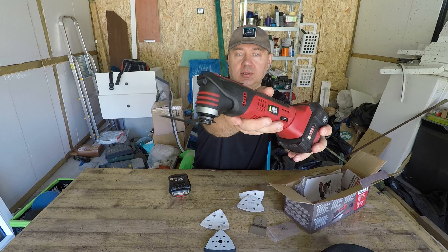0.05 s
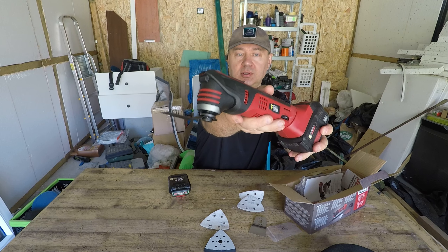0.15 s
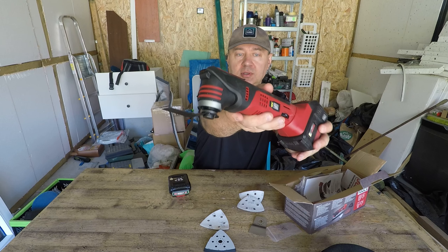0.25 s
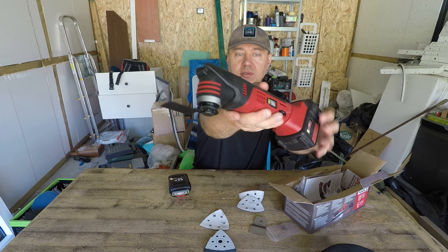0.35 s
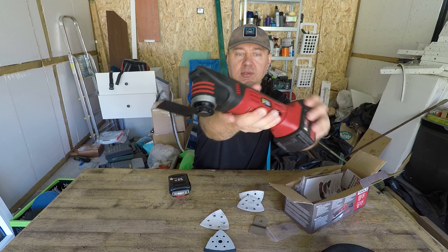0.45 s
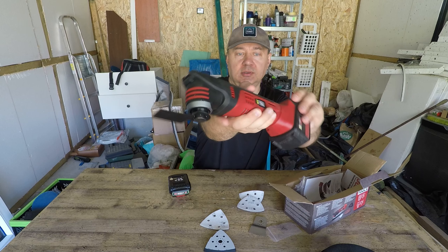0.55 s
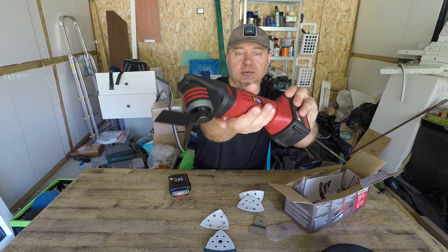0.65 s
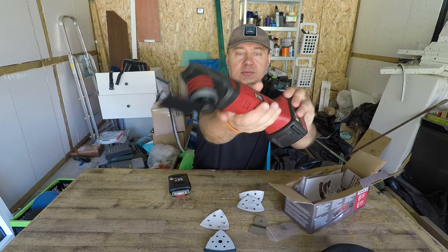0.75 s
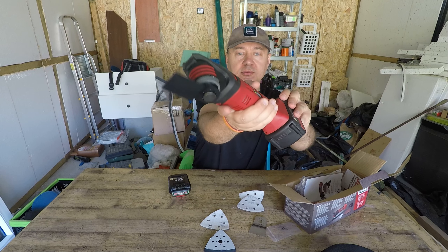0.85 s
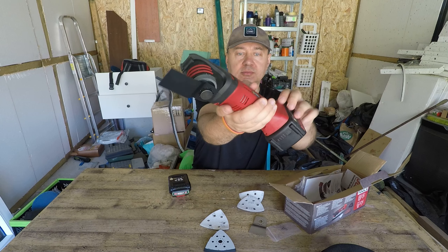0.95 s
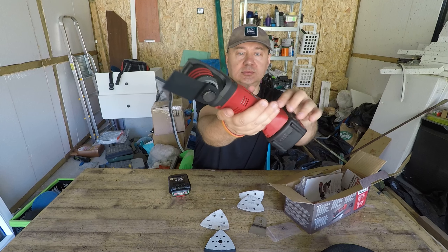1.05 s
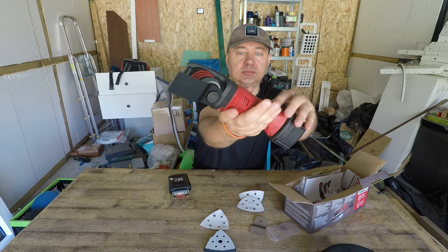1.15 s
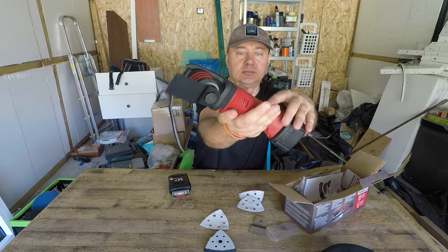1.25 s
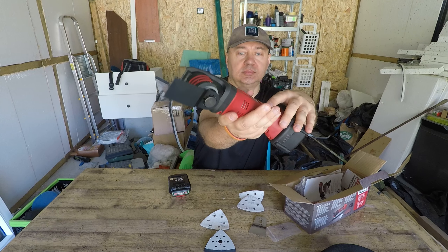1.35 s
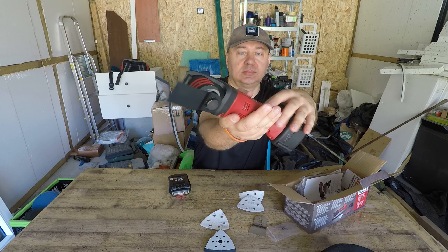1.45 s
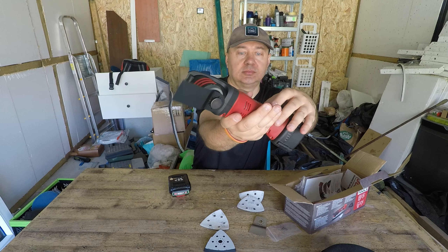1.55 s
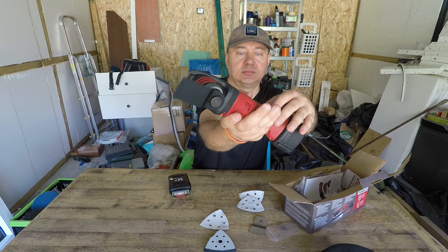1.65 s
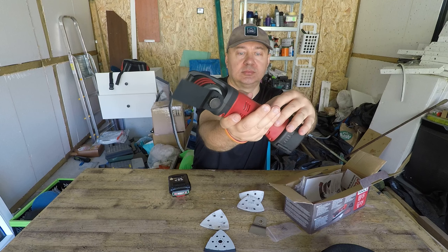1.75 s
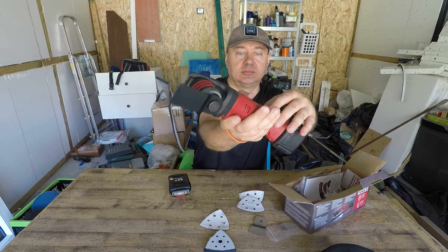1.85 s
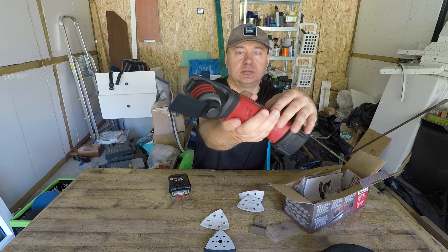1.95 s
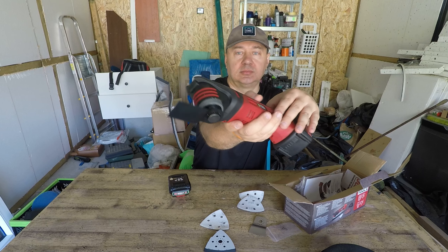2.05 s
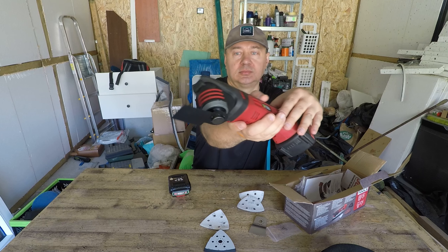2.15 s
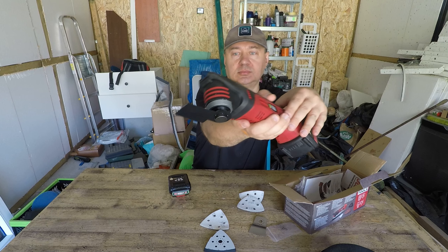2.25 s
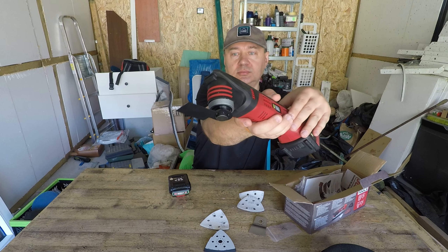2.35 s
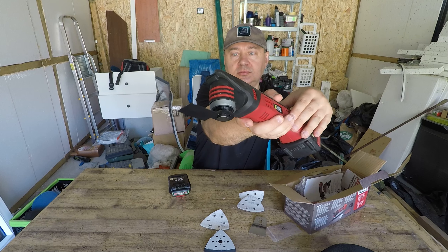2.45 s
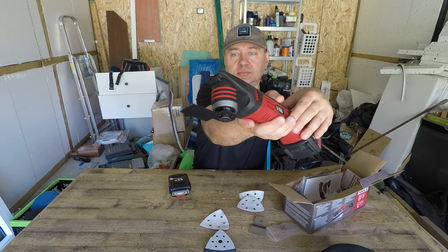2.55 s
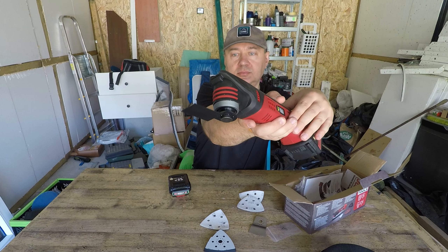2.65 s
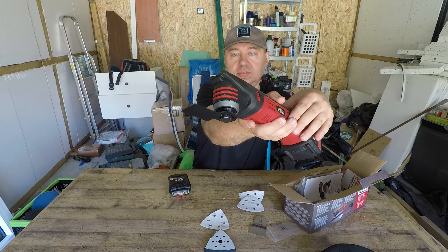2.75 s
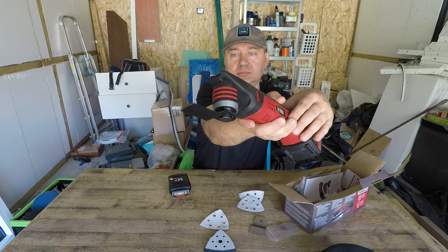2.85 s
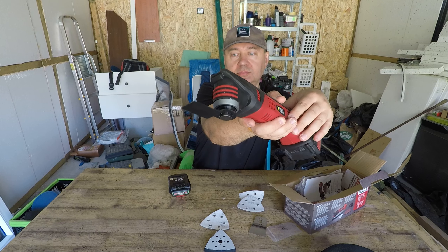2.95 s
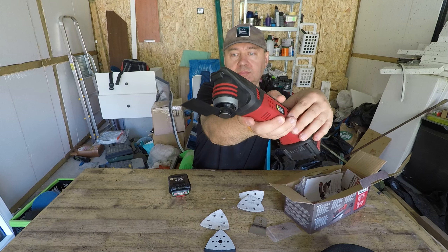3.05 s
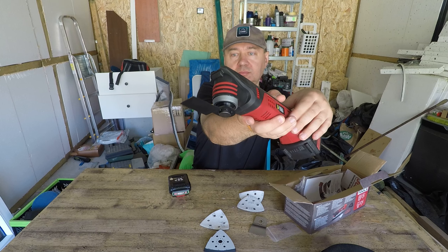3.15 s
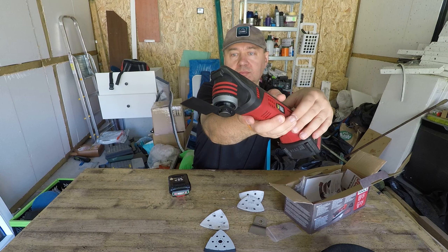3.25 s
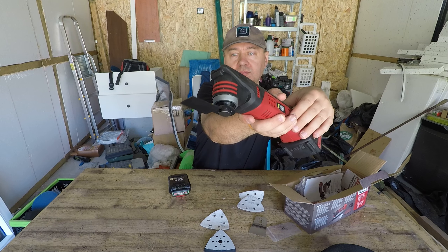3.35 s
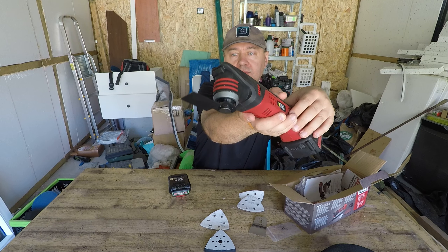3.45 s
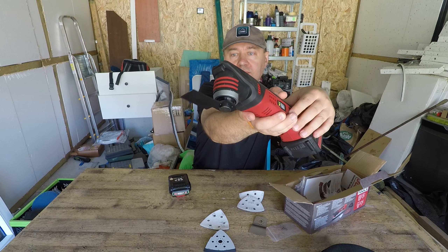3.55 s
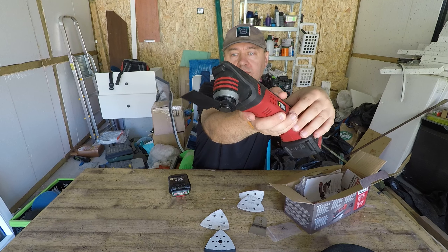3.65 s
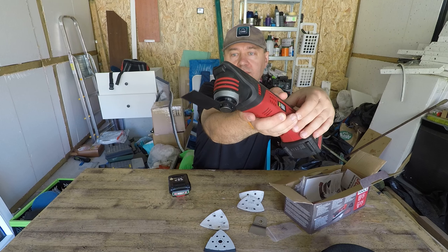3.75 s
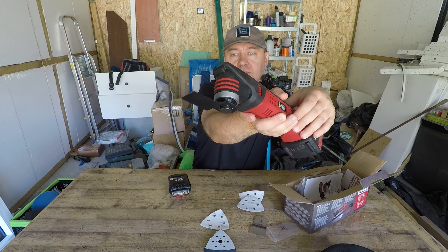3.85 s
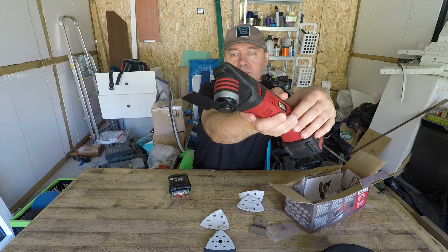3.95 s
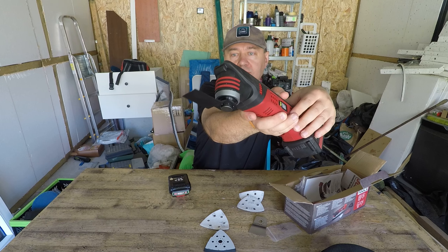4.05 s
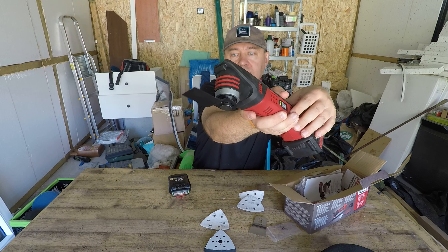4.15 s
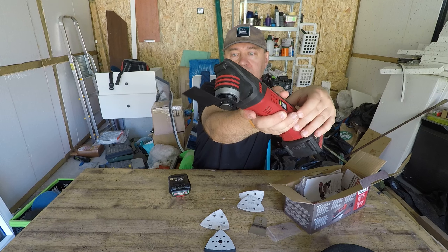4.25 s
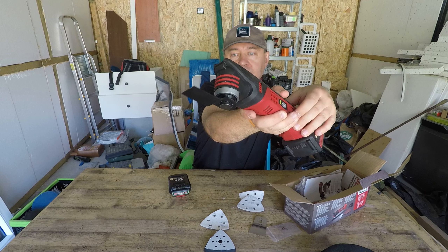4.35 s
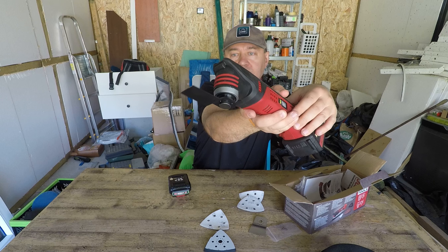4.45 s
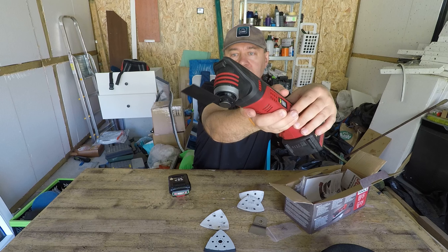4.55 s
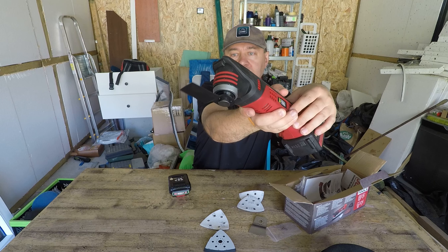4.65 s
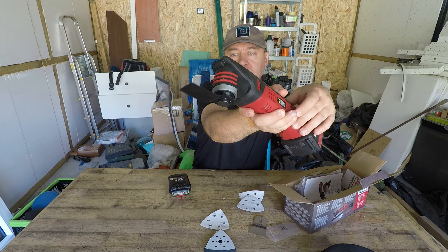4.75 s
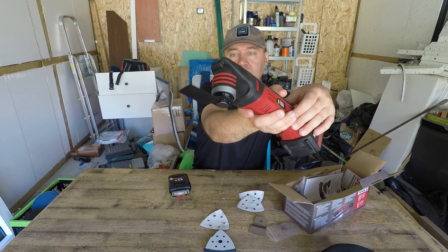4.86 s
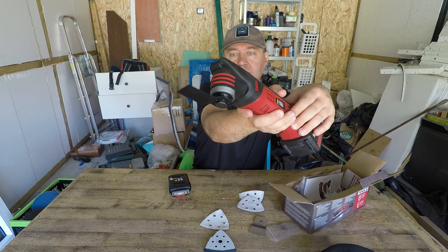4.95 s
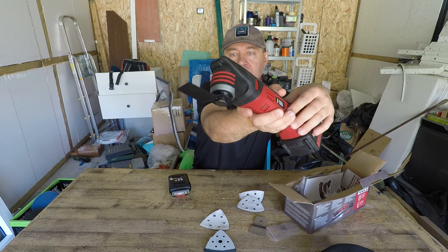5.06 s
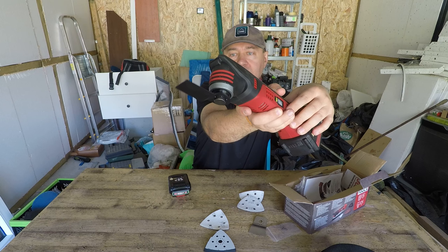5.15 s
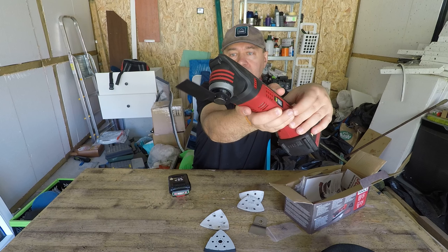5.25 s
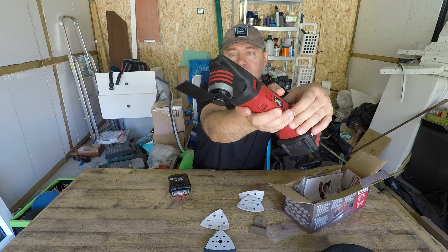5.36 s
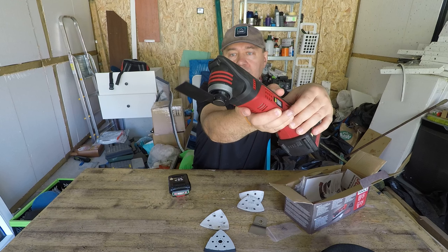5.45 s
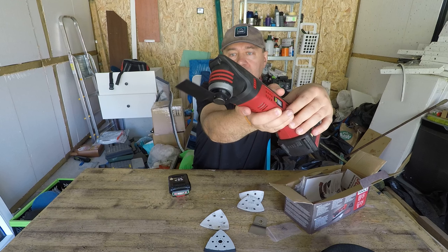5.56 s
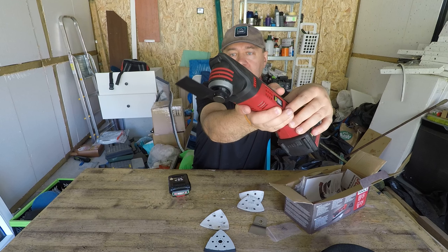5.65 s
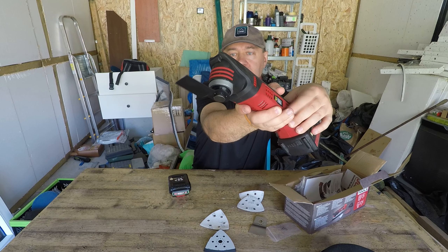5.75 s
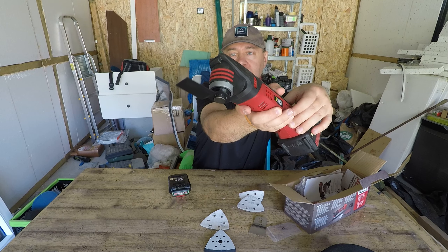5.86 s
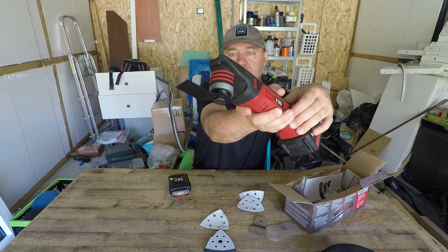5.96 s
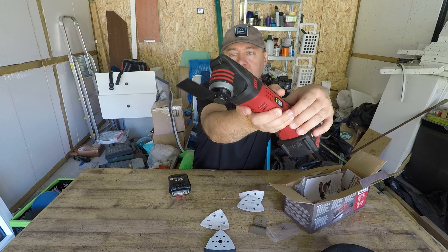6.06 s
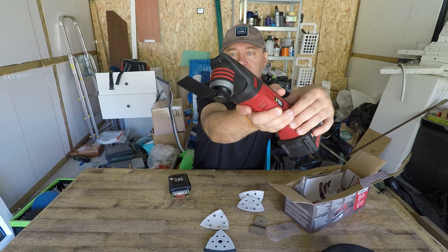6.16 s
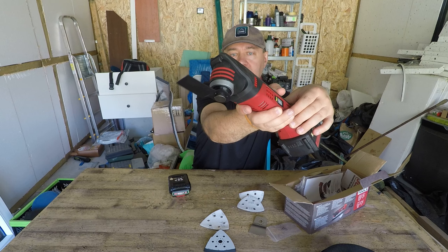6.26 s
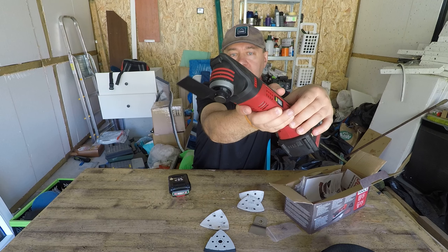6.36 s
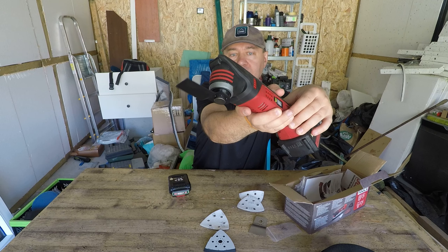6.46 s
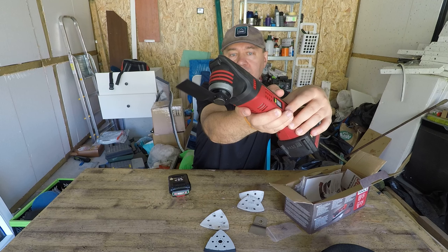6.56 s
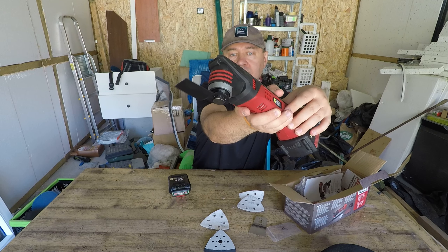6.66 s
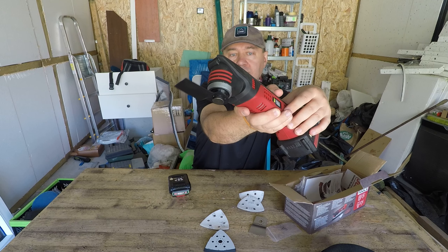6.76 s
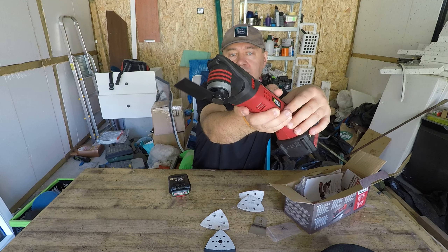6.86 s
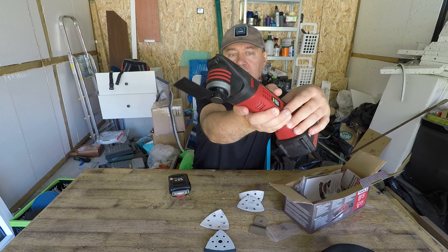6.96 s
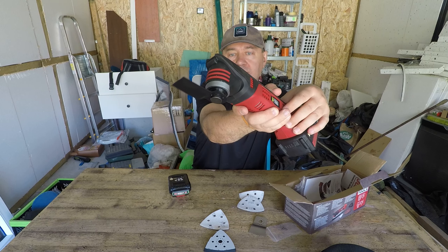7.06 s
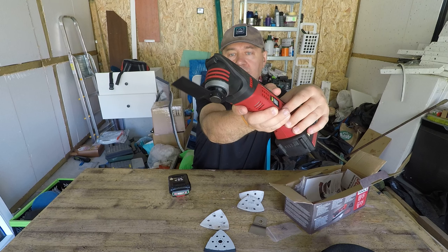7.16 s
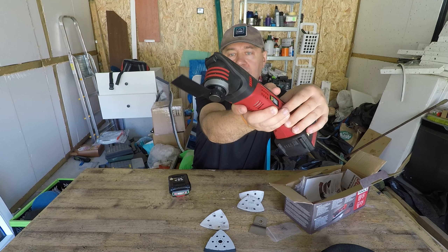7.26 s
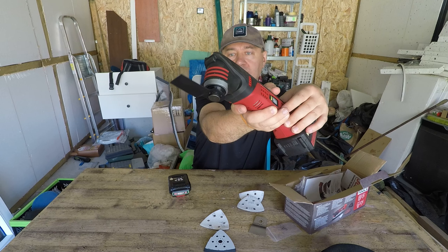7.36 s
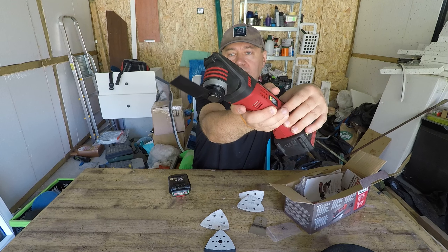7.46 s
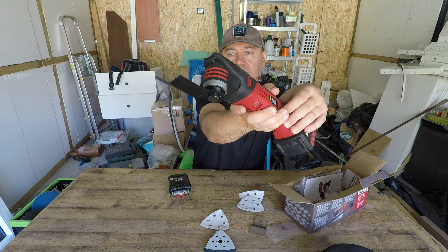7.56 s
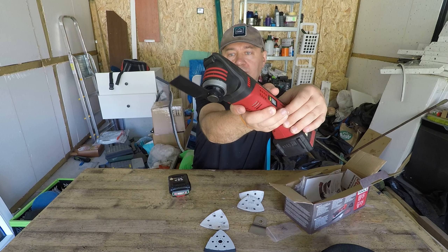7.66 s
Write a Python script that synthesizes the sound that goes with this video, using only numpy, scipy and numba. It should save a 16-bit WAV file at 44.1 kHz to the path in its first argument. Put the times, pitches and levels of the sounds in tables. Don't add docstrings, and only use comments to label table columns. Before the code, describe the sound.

A cordless oscillating tool rattles quietly at idle, then climbs in steps to a loud, hard, high-speed buzz in a garage.

```python
import sys
import numpy as np
from scipy import signal
from scipy.fft import rfft, irfft, next_fast_len
from scipy.io import wavfile
from scipy.ndimage import uniform_filter1d
from numba import njit

SR = 44100
rng = np.random.default_rng(int(sys.argv[2]) if len(sys.argv) > 2 else 0)


def file_out(sig):
    cols = np.atleast_2d(sig).T
    lim = np.clip(cols, -1, 1)
    pcm = np.round(lim * 32767).astype(np.int16)
    wavfile.write(sys.argv[1], SR, pcm)


def undo_db(level):
    steps = np.asarray(level, float) / 20
    return 10 ** steps


N = 339570

STEP = 64
IDLE_HZ, SLOW_HZ, MID_HZ, FAST_HZ = 66.0, 64, 93, 249.6
TIGHT_DB = -3

# start_s, level_db, rattle_db (play in the fork, against level),
# facing_db (head turned to the microphone)
RUNNING = [(0.0, -32, -0.5, -8), (0.39, -32.5, -1.5, -4.5), (1.22, -34.5, -1.5, -6), (1.5, -32, -2, 0.5),
           (2.59, -32, -1.5, -1), (3.04, -25.5, -2.5, 1.5), (3.26, -28, -1.5, -1.5), (3.54, -21.5, -1, -1),
           (3.69, -23.5, -2, -6), (3.97, -25, -1, -5.5), (4.22, -20.5, -5, -1.5), (4.42, -21.5, -6.5, -5),
           (4.61, -17.5, -4, -0.5), (4.93, -19.5, -3.5, -1.5), (5.06, -14.5, -4, -1),
           (5.49, -14.5, -5, -0.5), (5.68, -11.5, -3.5, -6), (7.7, -13, 0, -5)]


def shaft(step):
    # start_s, shaft_hz, lag_s
    notches = [
        (2.612, 82, .04),
        (2.795, 97, .117),
        (3.29, 110.5, .019),
        (3.454, 132.3, .06),
        (3.942, 158.1, .072),
        (4.478, 185.8, .046),
        (4.975, 219.3, .042),
        (5.487, 248.8, .036),
        (5.75, 251.3, .22),
    ]
    off_s, coast_hz_per_s = 7.625, 70
    t = np.arange(0, N + step, step) / SR
    hz = IDLE_HZ - coast_hz_per_s * np.maximum(t - off_s, 0)
    before = IDLE_HZ
    for s, goal, lag in notches:
        u = np.maximum(t - s, 0) / lag
        hz = hz + (goal - before) * (1 - (1 + u) * np.exp(-u))
        before = goal
    return hz


def surge(hz):
    return uniform_filter1d(np.abs(np.gradient(hz)) * SR / STEP, 40)


def tightness(hz):
    return np.clip((hz - 185) / 30, 0, 1)


def knock_orders(turns):
    # frequency_hz, level_db
    order_colour = [(120, -7), (200, -21), (600, 0), (1100, -4.5), (1800, -1.5), (3100, -6), (4200, 2),
                    (5500, 0), (6500, -12), (8000, -17.5), (9500, -26), (10800, -23.5), (12800, -11),
                    (15200, -8)]
    knock_shape = [3, 1.5, 2, 1.5, -0.5, 0.5, 5.5, 3, 1.5, 5.5, 2, 2.5, 1, 11, 1.5, 1, 4.5, 1, -5, 7, 1, -1]
    knock_share = (-2, -1.5, -2.5)
    # frequency_hz, level_db
    blade_swing = [(128, -40), (152, -25), (370, -29.5), (440, -48), (500, -36), (750, -22.5), (880, -18.5),
                   (1000, -44.5)]
    tone_orders = (9, 18, 14, 16)
    tone_levels = (-29, -26.5, -28.5, -27)
    # start_s, end_s, lift_db
    sings = [(3.68, 3.975, 6.5), (4.097, 4.326, 8), (4.567, 5.01, 5), (4.68, 5.026, 8), (4.604, 5.006, 4.5),
             (5.047, 5.5, 8), (5.05, 5.502, 5.5), (5.543, 5.79, 11), (5.577, 6.348, 8), (5.615, 6.04, 8),
             (5.674, 6.145, 5), (6.85, 7.25, 7), (7.35, 7.487, 5), (7.352, 7.469, 8), (3.75, 3.98, 8),
             (3.75, 3.972, 9), (4.15, 4.48, 7), (4.15, 4.497, 11.5), (3.65, 4.0, 13), (4.207, 4.48, 4),
             (4.2, 4.477, 0), (4.2, 4.48, 5), (4.66, 4.975, 8), (5.15, 5.5, 10), (5.15, 5.5, -9),
             (6.25, 7.648, -3), (6.595, 7.65, -10), (5.696, 6.3, -8), (5.699, 6.0, -12), (6.3, 6.9, 8)]
    singing_orders = (11, 15, 5, 12, 10, 20, 19, 6, 8, 10, 15, 19, 13, 6, 66, 68, 54, 55, 4, 16, 23, 8, 8,
                      23, 17, 8, 21, 19, 13, 20)
    # start_s, end_s, lift_db
    more_sings = [(5.58, 5.72, 8.5), (7.05, 7.14, 12), (7.33, 7.45, 9.5), (5.55, 6.7, 13), (7.33, 7.45, 10.5),
                  (6.25, 7.66, 8.5), (4.7, 4.85, 5), (5.12, 5.5, 9), (5.8, 6.0, 5.5), (6.45, 7.37, 7.5),
                  (7.46, 7.64, 7), (4.6, 4.82, 6), (5.75, 6.74, 8), (6.8, 5.75, 9.5), (5.4, 6.3, 5),
                  (6.65, 7.0, 5.5), (7.15, 7.4, 6), (7.46, 9.9, 6.5), (6.9, 7.2, 9.5), (6.3, 6.9, -9),
                  (7.2, 7.65, -15), (7.45, 7.65, 8), (6.6, 6.9, 4.5), (5.15, 5.7, 6), (4.1, 4.97, 6.5),
                  (6.3, 7.65, -5.5), (5.15, 5.4, 6), (6.0, 6.45, 5), (2.4, 4, -1), (4.1, 4.3, 7)]
    more_singing_orders = (2, 2, 2, 4, 4, 9, 18, 18, 18, 18, 18, 14, 14, 16, 16, 16, 16, 16, 4, 4, 10, 22, 24, 5, 3,
                           7, 26, 18, 6, 7)

    hz = shaft(STEP)
    t = np.arange(len(hz)) * STEP / SR
    level_db = curves(RUNNING, STEP)[0]
    share_db = np.interp(hz, [SLOW_HZ, 150, FAST_HZ], knock_share)
    order = np.arange(1, 121)[:, None]
    count = len(order)

    wander_db = 2.44 * walk(4, count, STEP) + 2.62 * walk(25, count, STEP)
    size = undo_db(colour_db(order_colour, order * hz, ring=0.79) + wander_db)
    size[4:4 + len(knock_shape)] *= undo_db(knock_shape)[:, None]
    loose_db = np.interp(hz, [SLOW_HZ, 150], [-6.5, 0])
    size *= undo_db(level_db + share_db + loose_db) * np.sqrt(2 / np.sum(size ** 2, axis=0))

    seat = undo_db(wander_db) * np.exp(-((order * hz - 13000) / 1500) ** 2)
    size *= order * hz < 11300
    size += seat * undo_db(bearing_db() - 4) * np.sqrt(2 / (np.sum(seat ** 2, axis=0) + 1))

    size[26:40] *= undo_db(5 * np.clip((hz - 240) / 8, 0, 1))
    size[14:26] *= undo_db(-TIGHT_DB / 2 * tightness(hz))

    fade = np.clip((hz - 115) / 12, 0, 1)
    octaves = np.log2(hz / FAST_HZ)
    swing_hz, swing_level = np.transpose(blade_swing)
    swing_db = np.interp(np.log(order[:4] * hz), np.log(swing_hz), swing_level) + 25.5 * octaves
    size[:4] += fade * (np.sqrt(2) * undo_db(swing_db + 0.25 * wander_db[:4]) - size[:4])
    for k, db in zip(tone_orders, tone_levels):
        tone_db = db + 24 * octaves + 0.42 * wander_db[k - 1]
        size[k - 1] += fade * (np.sqrt(2) * undo_db(tone_db) - size[k - 1])

    for numbers, spells in ((singing_orders, sings), (more_singing_orders, more_sings)):
        for k, (start, end, db) in zip(numbers, spells):
            size[k - 1] *= undo_db(db * np.clip(np.minimum(t - start, end - t) / 0.0093, 0, 1))

    smear = np.where((order > 21) & (order < 50), np.clip(250 / hz, 1, 1.4) ** 4, 1)
    spread = (.032 + .0012 * surge(hz)) * np.sqrt(np.minimum(order, 16)) * smear
    jitter = spread * walk(90, count, STEP)
    return stack(turns, size, 2 * np.pi * rng.random((count, 1)) + jitter, STEP)


@njit
def stack(turns, size, phase, step):
    out = np.zeros(len(turns))
    for k in range(len(size)):
        for i in range(len(turns)):
            j, u = i // step, (i % step) / step
            a = size[k, j] + u * (size[k, j + 1] - size[k, j])
            if a > 0:
                shift = phase[k, j] + u * (phase[k, j + 1] - phase[k, j])
                out[i] += a * np.sin(2 * np.pi * (k + 1) * turns[i] + shift)
    return out


def colour_db(points, hz, ring=1.):
    # centre_hz, width_hz, lift_db
    modes = [(667, 53, 6.5), (904, 105, 7.5), (1457, 18, 11), (1834, 290, 6.5), (2153, 26, 3.5),
             (2312, 127, 8.5), (2507, 62, 7.5), (2941, 41, 8), (3475, 20, 8.5), (3596, 194, 7.5),
             (3694, 36, 9), (3990, 62, 7), (4727, 32, 12), (4830, 180, -3.5), (5604, 104, 9),
             (6227, 180, 10), (8880, 610, 8), (12700, 250, 31)]
    f, db = np.transpose(points)
    lift = sum(d / (1 + (2 * (hz - c) / w) ** 2) for c, w, d in modes)
    return np.interp(np.log(hz + 1), np.log(f), db) + ring * lift


def rattle(turns, hz):
    # frequency_hz, density_db (dB per Hz)
    slow_colour = [(150, -41), (250, -5), (620, -5), (651, -3), (705, -10.5), (1050, -3), (1470, -1),
                   (3110, -6.5), (3470, -5), (5340, -5.5), (7580, -21), (11300, -19.5), (14700, -60),
                   (22000, -120)]
    mid_colour = [(150, -52), (250, -8), (683, -8), (1030, -9), (1420, -1), (1540, -12), (1810, -1),
                  (3260, -8), (3530, -10.5), (5340, -1), (6890, -23.5), (11300, -31), (14700, -68),
                  (22000, -120)]
    fast_colour = [(150, -20), (250, -17), (420, -19.5), (800, -13), (1500, -11), (2300, -9.5),
                   (3200, -7.5), (3700, -3.5), (4700, 4), (6300, -7), (7000, -7.5), (9000, -22.5),
                   (11000, -31), (14000, -47)]

    level_db, share_db, facing_db = (c[:N] for c in curves(RUNNING, step=1))
    noise = rng.standard_normal(N)
    knock = band_pass(noise, 2, 2800, 6000)
    burst = gate(turns, sharp=0.91, second=0.38) * noise
    burst = burst + (gate(turns, sharp=1.9, second=0.42) - 1) * knock
    colours = [shaped(burst, slow_colour, ring=0.56), shaped(burst, mid_colour, ring=1.15),
               shaped(burst, fast_colour, ring=0.53)]
    speeds = [SLOW_HZ, MID_HZ, FAST_HZ]
    body = sum(np.interp(hz, speeds, share) * c for share, c in zip(np.eye(3), colours))

    treble_band = signal.butter(2, [3000, 6500], "band", fs=SR, output="sos")
    treble = signal.sosfiltfilt(treble_band, body)
    body = body + (undo_db(facing_db + 1.5 + TIGHT_DB * tightness(hz)) - 1) * treble

    hiss = gate(turns, sharp=5.8, second=1.0) * rng.standard_normal((2, N))
    top = unit(band_pass(hiss, 2, 11400, 14600)) * undo_db(np.repeat(bearing_db(), STEP)[:N] - 2.5)
    return body * undo_db(level_db + share_db) + top[0] + 0.47 * np.array([top[1], -top[1]])


def gate(turns, sharp, second):
    half = 2 * turns
    strength = undo_db(1.9 * rng.standard_normal(N // 50))[half.astype(int)]
    return 1 + sharp * strength * np.exp(-(half % 1) / 0.2) * np.where(half % 2 < 1, 1, second)


def bearing_db():
    hiss_levels = (-25, -25.5, -25, -17)
    hz = shaft(STEP)
    level_db, _, facing_db = curves(RUNNING, STEP)
    keep = np.exp(-STEP / SR / .2)
    late = IDLE_HZ + signal.lfilter([1 - keep], [1, -keep], hz - IDLE_HZ)
    return level_db + .5 * facing_db + np.interp(late, [IDLE_HZ, 95, 220, 250], hiss_levels)


def whine(hz):
    # pitch_hz, level_db
    drive_tones = [(198.5, -57), (661, -55), (1456, -57), (2636, -57), (3273, -56), (3338.5, -47.5),
                   (4661, -55), (6681, -65)]
    # centre_s, length_s, lift_db
    swells = [
        (1.55, 0.77, 10.5),
        (.6, 0.21, 4),
        (2.35, 0.25, 1.5),
    ]
    swelling_tones = (0, 5, 5)
    t = np.arange(N) / SR
    drift = np.repeat(walk(11, len(drive_tones), STEP), STEP, axis=1)[:, :N]
    lift_db = 1.3 * drift
    for k, swell in zip(swelling_tones, swells):
        lift_db[k] += bump(t, *swell)
    tones = np.zeros(N)
    for (f, db), d, up in zip(drive_tones, drift, lift_db):
        tones += np.sqrt(2) * undo_db(db + up) * np.sin(2 * np.pi * f * t + .3 * d)
    return tones * undo_db(-.6 * (hz - IDLE_HZ))


def grip():
    # centre_s, length_s, level_db
    rustles = [
        (0.468, .05, -35.5),
        (.86, .025, -34),
    ]
    # centre_s, length_s, level_db
    thump = (1.485, .035, -34)
    t = np.arange(N) / SR
    swell = sum(bump(t, s, length, undo_db(db)) for s, length, db in rustles)
    skin = unit(band_pass(rng.standard_normal(N), 4, 3300, 5500))
    dull = unit(band_pass(rng.standard_normal(N), 2, 170, 330))
    thump_s, thump_length, thump_db = thump
    return swell * skin + bump(t, thump_s, thump_length, undo_db(thump_db)) * dull


def room(tool):
    t60_s, level_db = .3, -17
    t = np.arange(SR // 2) / SR
    tail = rng.standard_normal(len(t)) * np.exp(-np.log(1000) * t / t60_s) * (t > .004)
    wet = signal.fftconvolve(tool.mean(axis=0), tail / np.linalg.norm(tail))[:N]
    return undo_db(level_db) * wet


def air():
    # centre_s, length_s, lift_db
    gusts = [
        (1.506, 0.19, 10),
        (2.814, 0.048, 5),
        (3.29, 0.095, 10.5),
        (4.2, 0.088, -2),
        (4.66, 0.064, 2),
        (6.809, 0.12, 4.5),
    ]
    fan_levels = (-49, -51, -45, -40)
    t = np.arange(N) / SR
    flutter_db = 1.6 * walk(24, 1, 1)[0, :N] + 2.3 * walk(7, 1, 1)[0, :N]
    gust_db = sum(bump(t, *gust) for gust in gusts)
    fan_db = np.interp(shaft(step=1)[:N], [IDLE_HZ, 130, 185, 220], fan_levels)
    rumble = unit(band_pass(rng.standard_normal(N), 3, 135, 230))
    return rumble * undo_db(fan_db + flutter_db + gust_db)


def unit(x):
    return x / np.sqrt(np.mean(x ** 2))


def bump(t, centre_s, length_s, height):
    return height * np.exp(-((t - centre_s) / length_s) ** 2)


def band_pass(x, order, low_hz, high_hz):
    return signal.sosfilt(signal.butter(order, [low_hz, high_hz], "band", fs=SR, output="sos"), x)


def curves(table, step):
    s, *columns = np.transpose(table)
    return [np.interp(np.arange(0, N + step, step) / SR, s, c) for c in columns]


def shaped(x, points, ring=1.):
    size = next_fast_len(N)
    hz = np.arange(size // 2 + 1) * SR / size
    return unit(irfft(rfft(x, size) * undo_db(colour_db(points, hz, ring)), size)[:N])


def walk(rate, count, step):
    k = max(int(SR / step / rate), 1)
    length = N // step + 2
    held = np.repeat(rng.standard_normal((count, length // k + 1)), k, axis=1)
    smooth = uniform_filter1d(uniform_filter1d(held, k), k)
    return 1.28 * smooth[:, :length - (N % step == 0)]


def scene():
    hz = shaft(1)[:N]
    turns = np.cumsum(hz) / SR
    tool = knock_orders(turns) + rattle(turns, hz) + whine(hz) + grip()
    return tool + room(tool) + air()


def low_pass(x):
    return signal.sosfilt(signal.butter(12, 15240, fs=SR, output="sos"), x)


def record(dry):
    rounded = .85 * np.tanh(dry / .8)
    notched = signal.lfilter(*signal.iirnotch(11200, 6., fs=SR), rounded)
    bass_cut = signal.cheby2(8, 50, 100, "high", fs=SR, output="sos")
    heard = signal.sosfilt(bass_cut, 0.096 * dry + 0.88 * notched)
    level_db = np.repeat(curves(RUNNING, STEP)[0], STEP)[:N]
    hum = undo_db(-47 + .2 * level_db) * rng.standard_normal(N)
    floor = band_pass(hum, 1, 40, 120)
    hiss = undo_db(-53) * band_pass(rng.standard_normal(N), 2, 9500, 13000)
    return low_pass(heard + floor + hiss)


dry = scene()
out = record(dry)
file_out(out)
```